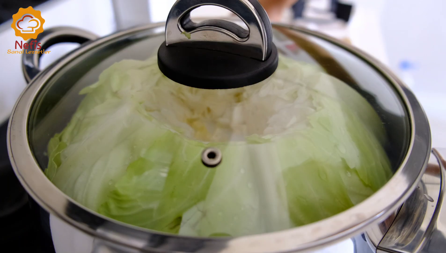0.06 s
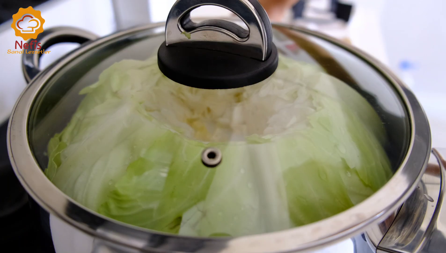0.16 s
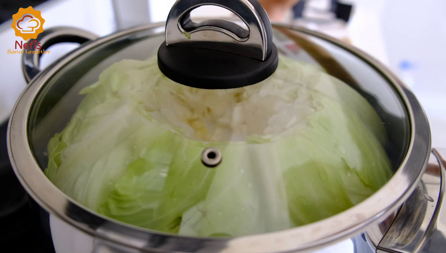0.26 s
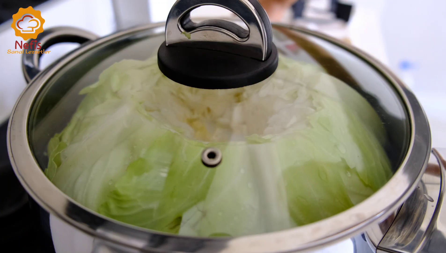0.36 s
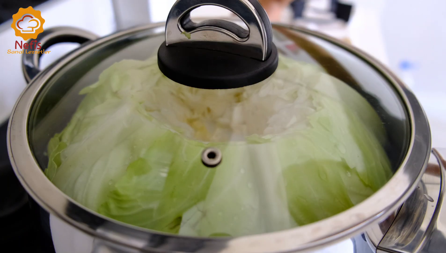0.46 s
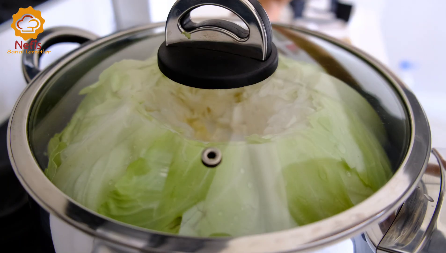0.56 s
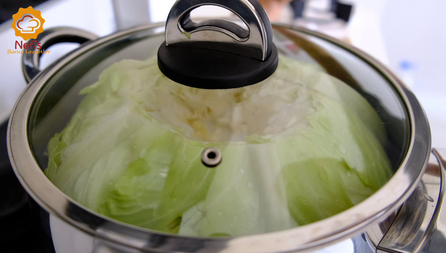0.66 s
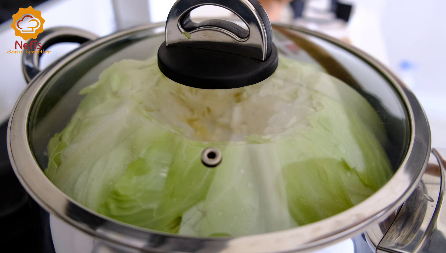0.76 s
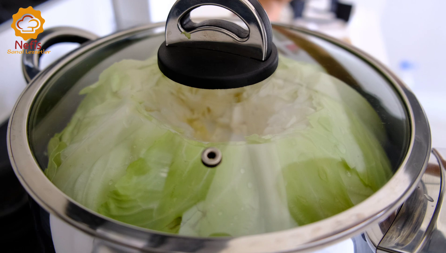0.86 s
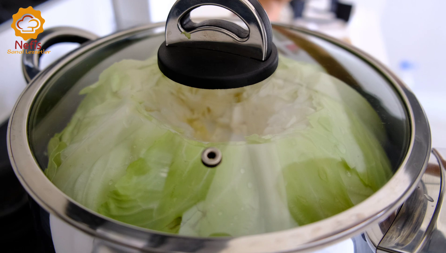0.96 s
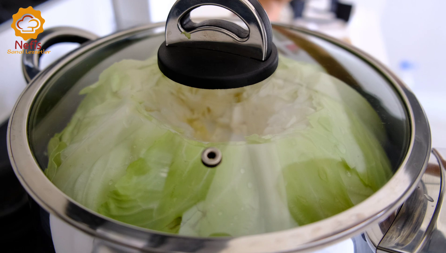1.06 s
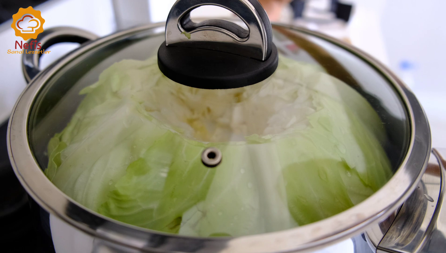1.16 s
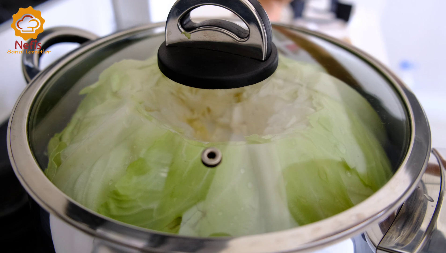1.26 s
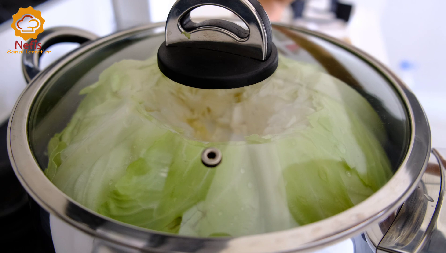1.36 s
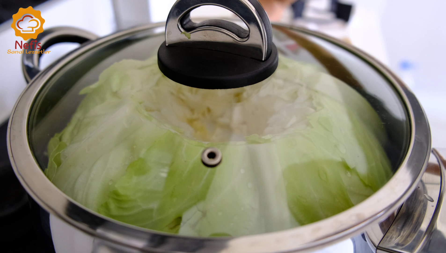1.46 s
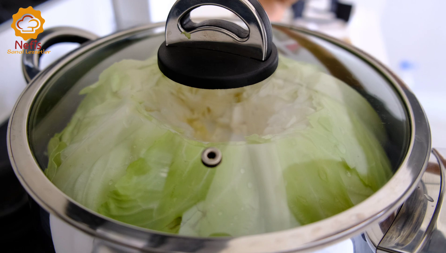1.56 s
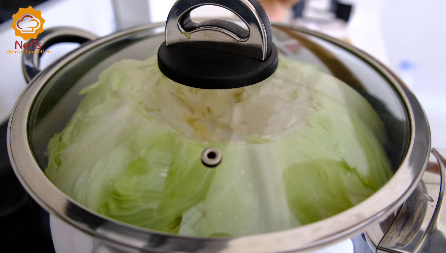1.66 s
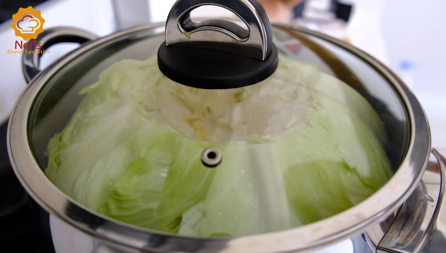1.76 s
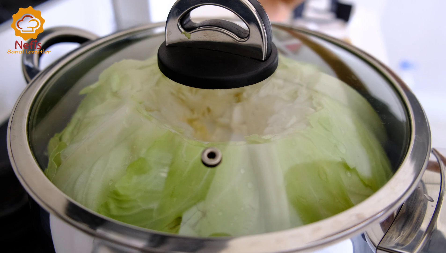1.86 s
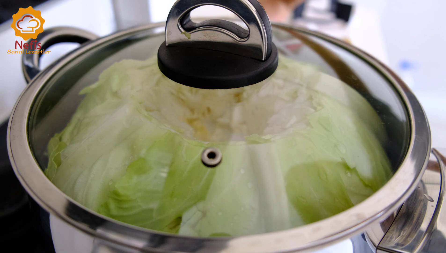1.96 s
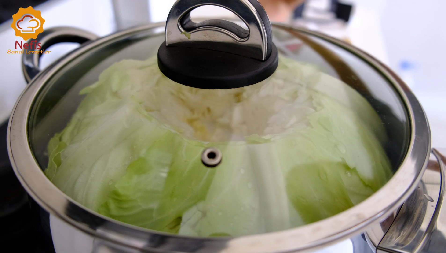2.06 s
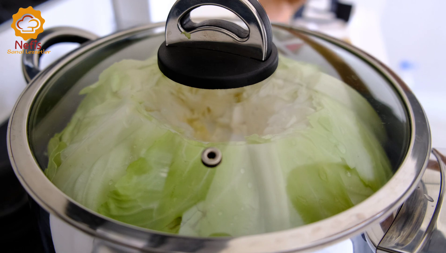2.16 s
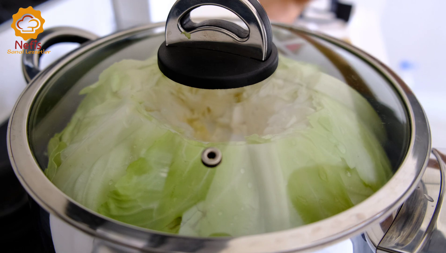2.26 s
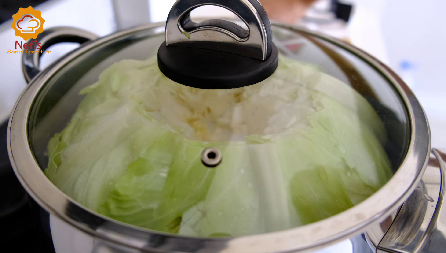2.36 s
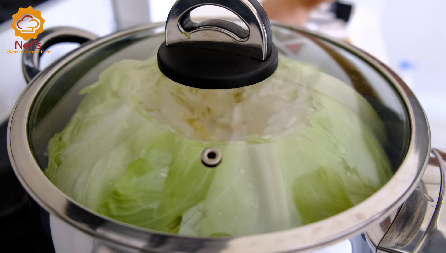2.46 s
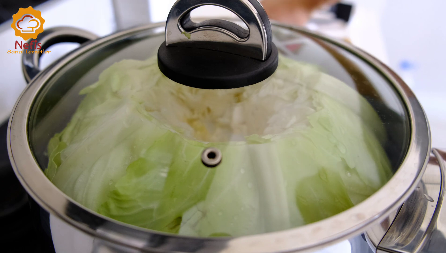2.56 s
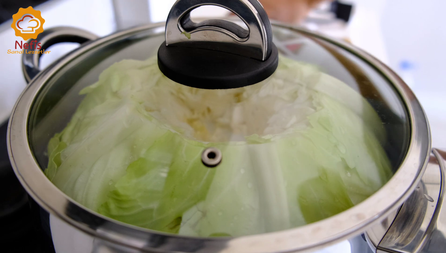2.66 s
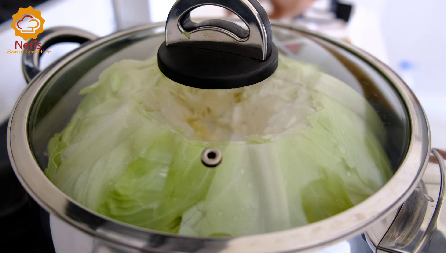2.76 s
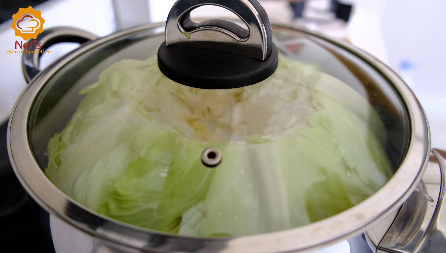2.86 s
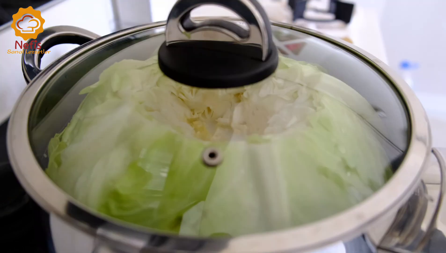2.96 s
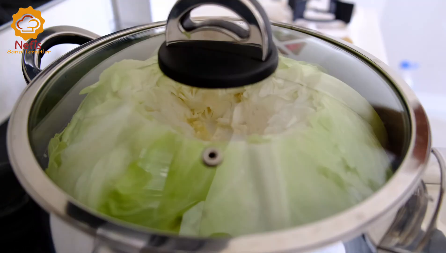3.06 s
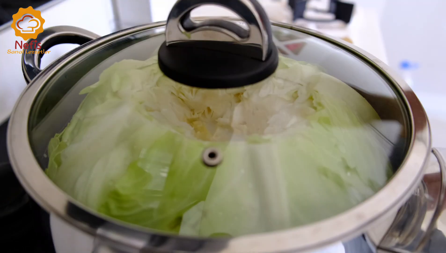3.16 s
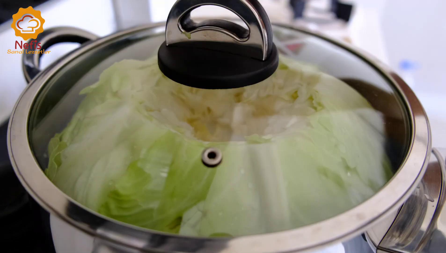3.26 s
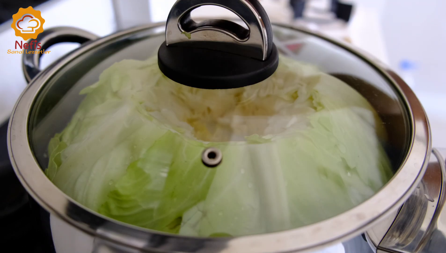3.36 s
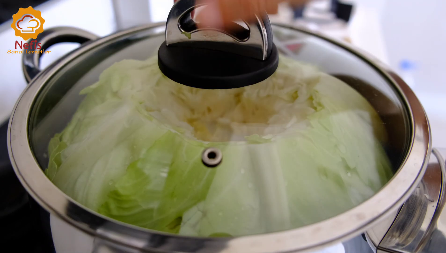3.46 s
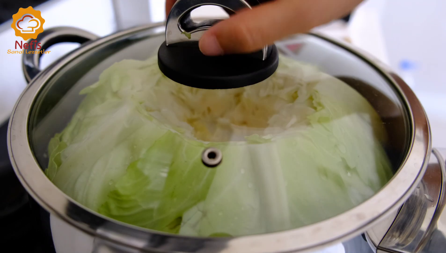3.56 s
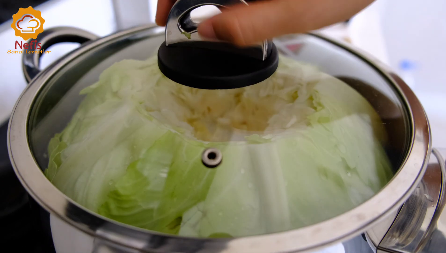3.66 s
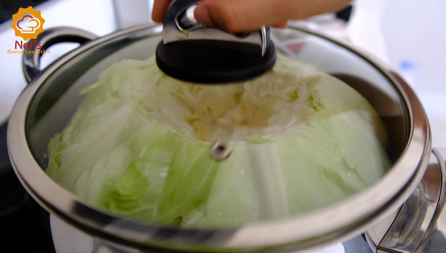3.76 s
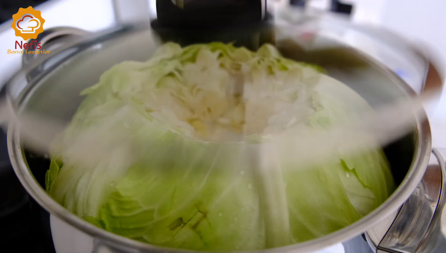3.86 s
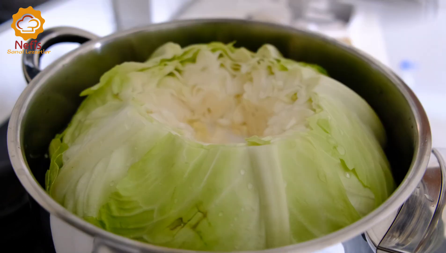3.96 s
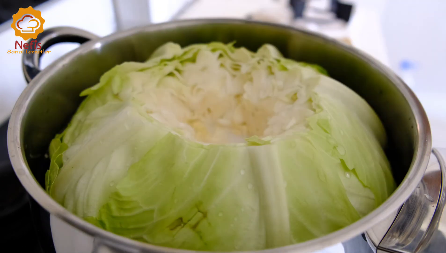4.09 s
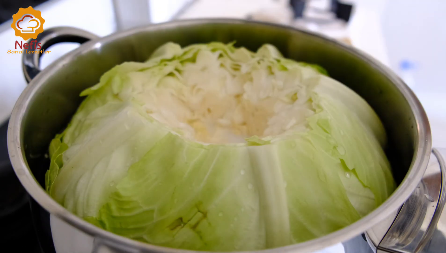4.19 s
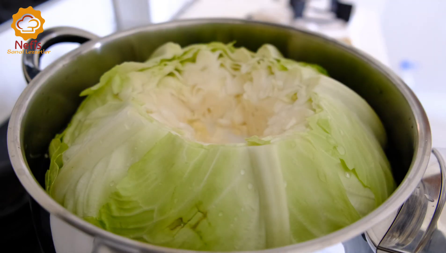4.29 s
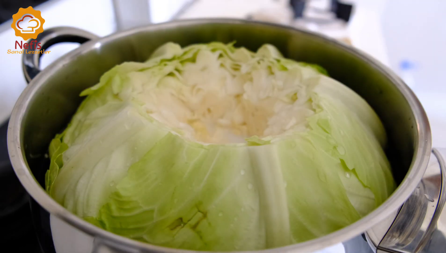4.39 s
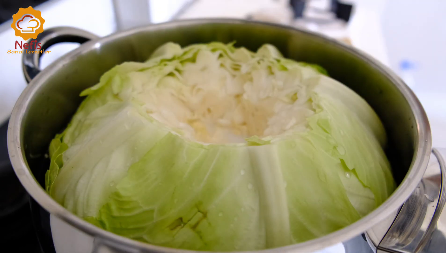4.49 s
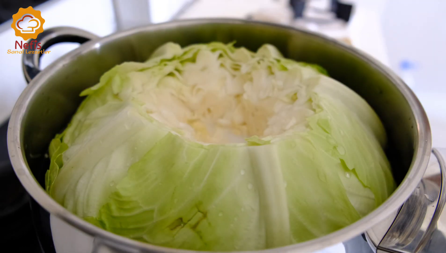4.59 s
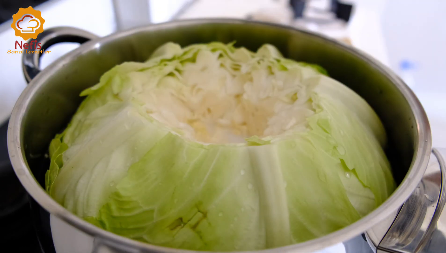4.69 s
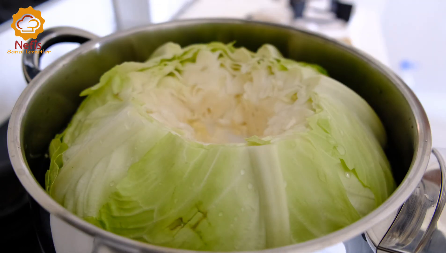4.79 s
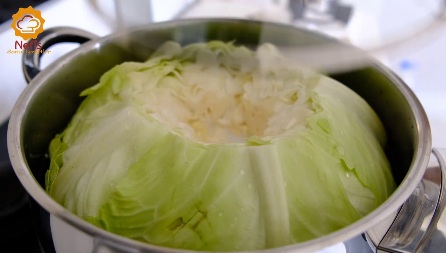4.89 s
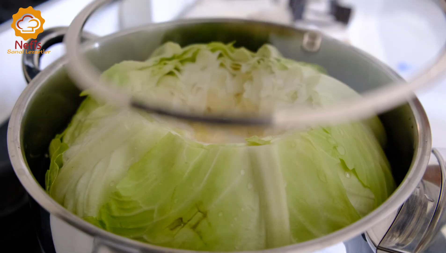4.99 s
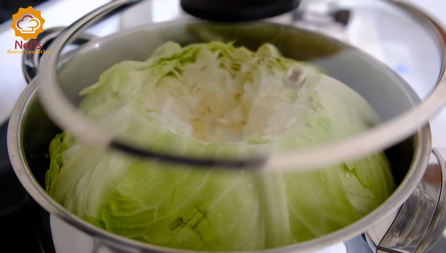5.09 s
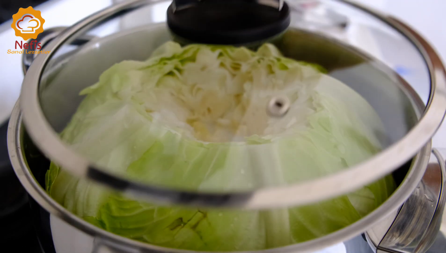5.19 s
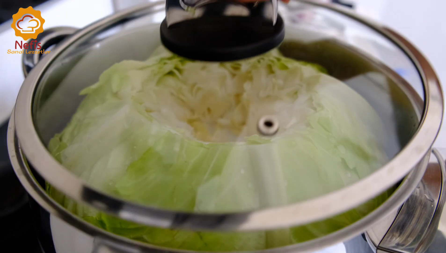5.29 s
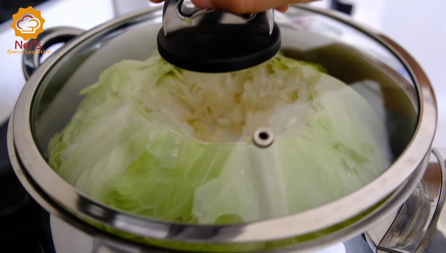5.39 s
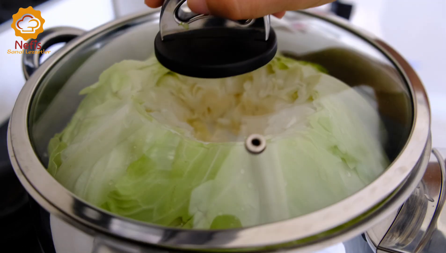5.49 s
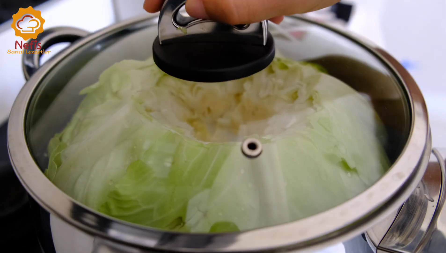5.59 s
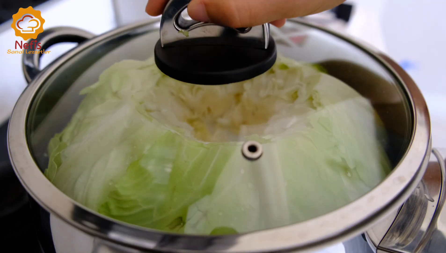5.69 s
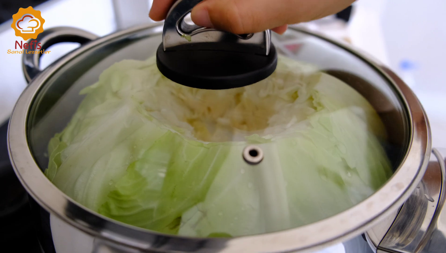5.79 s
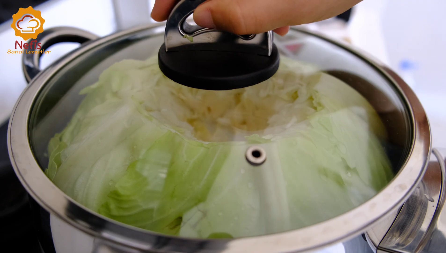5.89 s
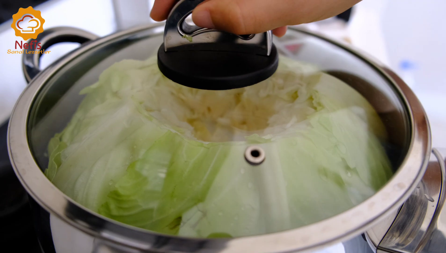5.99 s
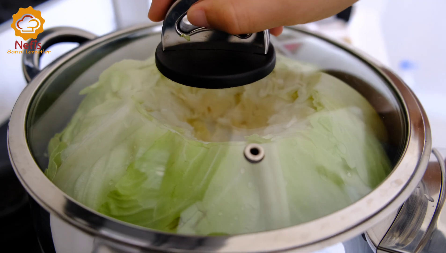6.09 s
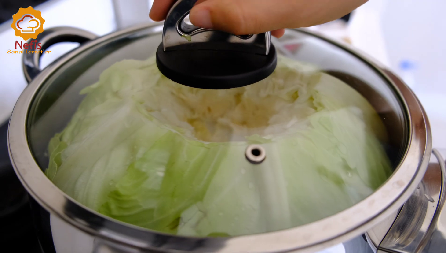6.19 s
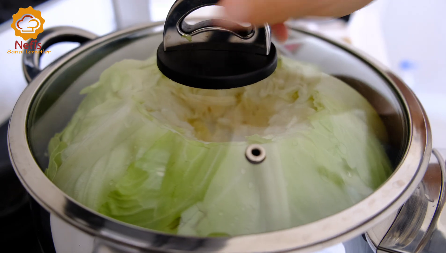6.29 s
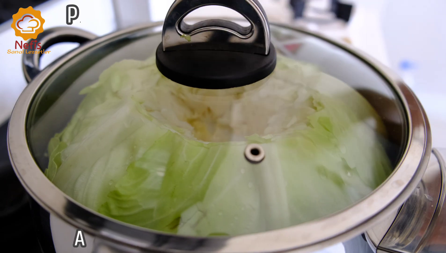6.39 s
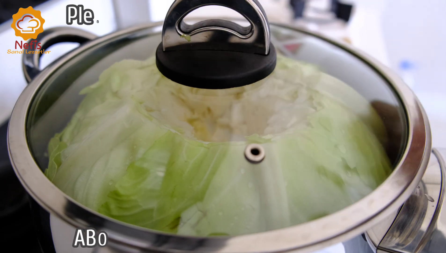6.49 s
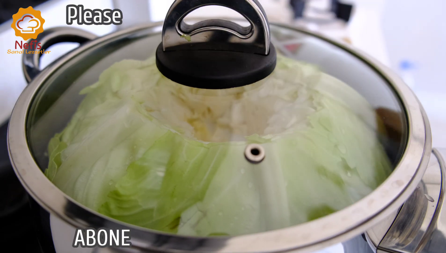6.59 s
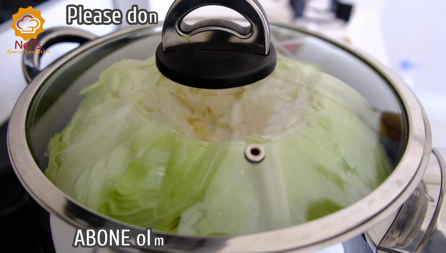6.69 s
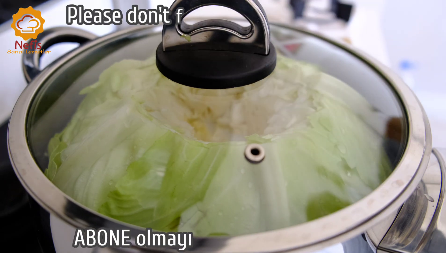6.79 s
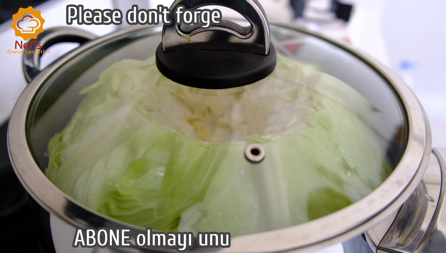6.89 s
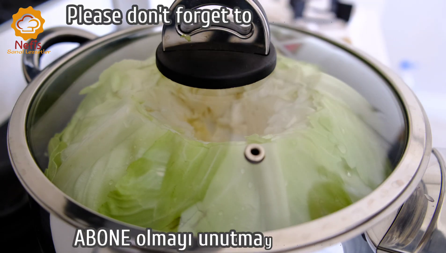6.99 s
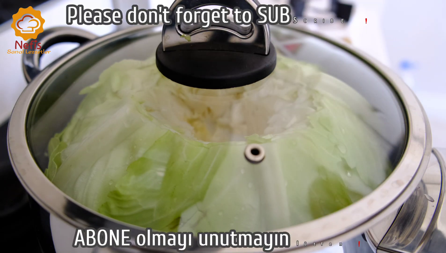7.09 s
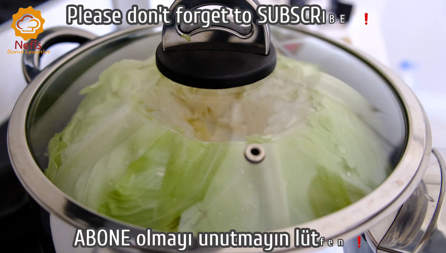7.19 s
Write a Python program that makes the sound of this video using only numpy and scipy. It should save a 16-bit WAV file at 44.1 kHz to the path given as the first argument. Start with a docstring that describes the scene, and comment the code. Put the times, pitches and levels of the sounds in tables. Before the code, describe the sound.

Stove knob clicks and five sharp igniter snaps over hissing gas, followed by a steady burner and a glass pot lid rattling.

```python
"""Covered pot on a gas ring

Close to the stove in a small kitchen, on a stereo microphone. The knob is pushed in, gas hisses and the
igniter sparks five times; the knob springs back and the gas stops. After a short gap the burner hisses
steadily, heard from another spot, while the glass lid is lifted off and set back on the steel rim.
The recorder's gain control ducks after every loud snap."""
import sys
import numpy as np
from scipy import signal
from scipy.fft import rfft, irfft, next_fast_len
from scipy.io import wavfile

SR = 44100
rng = np.random.default_rng(int(sys.argv[2]) if len(sys.argv) > 2 else 0)


def int16_out(signal):
    """Quantize to a 16-bit WAV file."""
    q = np.round(np.clip(np.atleast_2d(signal).T, -1, 1) * 32767)
    wavfile.write(sys.argv[1], SR, q.astype(np.int16))


N = 319284
TIME = np.arange(N) / SR
GAP_START_S, GAP_END_S = 2.998, 3.012   # near silence just before the steady burner


def amp(db):
    """Decibels to gain."""
    return 10 ** (np.asarray(db, float) / 20)


def rms_one(x):
    """Scale to unit rms."""
    return x / np.sqrt(np.mean(x ** 2) + 1e-20)


def at_hz(points, hz):
    """Read (frequency, value) points on a log-frequency axis."""
    point_hz, values = np.transpose(points)
    return np.interp(np.log(hz + 1), np.log(point_hz), values)


def butter(x, hz, kind, order=2):
    """Butterworth filter."""
    return signal.sosfilt(signal.butter(order, hz, kind, fs=SR, output="sos"), x)


def shape(x, response):
    """Filter by a response given as a function of Hz."""
    size = next_fast_len(N + SR // 8)
    return irfft(rfft(x, size) * response(np.arange(size // 2 + 1) * SR / size), size)[..., :N]


def diffuse(colour):
    """Noise from all around the microphone, alike in the bass and unrelated in the treble; rms 1."""
    # likeness of left and right: (frequency [Hz], correlation [-1..1])
    likeness = [(60, 0.36), (180, 0.57), (550, 0.83), (1650, 0.096), (4970, 0.036), (15000, 0.08)]
    mid, side = rng.standard_normal((2, N))
    mid = shape(mid, lambda hz: amp(at_hz(colour, hz)) * np.sqrt(1 + at_hz(likeness, hz)))
    side = shape(side, lambda hz: amp(at_hz(colour, hz)) * np.sqrt(1 - at_hz(likeness, hz)))
    return rms_one(np.array([mid + side, mid - side]))


def room(x):
    """Kitchen reverberation: octave bands of noise, each dying at its own rate."""
    # decay of the room: (frequency [Hz], t60 [s])
    room_t60 = [(100, 0.47), (1000, 0.41), (5000, 0.31), (15000, 0.23)]
    t, tail = TIME[:SR // 2], 0
    white = diffuse([(20, 0), (20000, 0)])[:, :len(t)]
    for low_hz in 40 * 2. ** np.arange(9):
        band = butter(white, [low_hz, min(2 * low_hz, 19000)], "band")
        tail = tail + band * amp(-60 * t / at_hz(room_t60, 1.4 * low_hz))
    tail *= np.clip(t / 0.002, 0, 1) ** 2   # the first walls answer after a few ms
    return signal.fftconvolve(x, rms_one(tail) / np.sqrt(len(t)), axes=1)[:, :N]


def kitchen_air():
    """Room tone: it fades slowly, drops out in the gap and stays low beside the burner."""
    # spectrum of the quiet kitchen: (frequency [Hz], density [dB])
    colour = [(15, -41), (25, 1), (221, -14.5), (253, -21.5), (322, -9.5), (445, -21.5), (495, -9),
              (631, -14.5), (1660, -16), (10600, -38), (15500, -43)]
    level_db = np.select([TIME < GAP_START_S, TIME < GAP_END_S], [-51.5 - 2.2 * TIME, -72], -58.5)
    return amp(level_db) * diffuse(colour)


def hand_rustle():
    """A hand brushes about: each stroke of noise swells to its peak and fades."""
    # strokes: (peak time [s], peak level [dB], swell [dB/s], fade [dB/s])
    brushes = [(2.796, -52.5, 93, 350), (2.902, -53, 1200, 209)]
    # spectrum of the brushing: (frequency [Hz], density [dB])
    colour = [(120, -33), (200, -15), (3120, -23.5), (5300, -26.5), (6590, -29), (8050, -30),
              (15500, -39.5)]
    strokes_db = [peak_db - np.where(TIME < s, swell * (s - TIME), fade * (TIME - s))
                  for s, peak_db, swell, fade in brushes]
    return amp(np.max(strokes_db, axis=0)) * diffuse(colour)


def burner_resonances():
    """The jet sings in the air spaces of burner and pot base; each reaches the two capsules differently."""
    # air spaces: (frequency [Hz], width [Hz], level igniting [dB], level steady [dB],
    # left over right [dB], left lag [ms])
    air_spaces = [(711, 398, -15, -10.5, -0.5, 0.022), (973, 103, -5, -2.5, 2.5, 0.078),
                  (1050, 57, -1.5, -0.5, 5, .05), (1170, 202, -5.5, -8, -8.5, .06),
                  (1277, 190, 0.5, 0, 0.5, .07), (1463, 150, -5.5, -6, -1, 0.14),
                  (3265, 210, -5.5, -6, 2, 0.088), (3724, 180, -7.5, -2, -6, 0.067),
                  (3870, 60, -8.5, -15.5, -3.5, .04), (4768, 220, -8.5, -6.5, 5, .01),
                  (5880, 470, -13.5, -10.5, -0.5, 0.061), (6730, 540, -17.5, -15, 2, .04),
                  (7740, 140, -20.5, -15.5, 2, 0.027), (8640, 140, -20.5, -14, 2.5, .01),
                  (8693, 220, -19.5, -18.5, 0, .01), (10200, 360, -24, -24, -2.5, 0.013),
                  (11160, 470, -16.5, -12.5, 2, 0.029), (12830, 480, -34.5, -25, 2.5, 0.0096)]
    peak_hz, width_hz, igniting_db, steady_db, pan_db, lag_ms = np.transpose(air_spaces)[:, :, None]
    grid = np.geomspace(20, SR / 2, 3000)
    polarity = (-1.) ** np.arange(len(air_spaces))[:, None]
    peaks = polarity / (1 + 1j * (grid ** 2 - peak_hz ** 2) / (grid * width_hz)) ** 2
    half_lag = np.pi * grid * lag_ms / 1000
    responses = [np.sum(peaks * amp(level_db + side * pan_db / 2) * np.exp(-1j * side * half_lag), 0)
                 for level_db in (igniting_db, steady_db) for side in (1, -1)]
    sung = shape(rng.standard_normal(N), lambda hz: np.array([np.interp(hz, grid, r) for r in responses]))
    pitch = np.where(TIME < .245, 1.055, 1 - .017 * TIME)   # higher while raw gas first fills the spaces
    igniting = [np.interp(np.cumsum(pitch), np.arange(N), channel) for channel in sung[:2]]
    return rms_one(np.where(TIME < (GAP_START_S + GAP_END_S) / 2, igniting, sung[2:]))


def gas_jet():
    """Jet noise, part resonant, part diffuse: it dies as the knob is let go and is steady after the gap."""
    # spectrum of the diffuse hiss: (frequency [Hz], density [dB])
    colour = [(18, -28.5), (35, -3.5), (114, -3.5), (400, -22), (1260, -14), (2690, -16.5), (3780, -16),
              (4900, -16.5), (5400, -23.5), (6400, -19), (8000, -25.5), (9500, -22), (11500, -21.5),
              (14800, -26.5), (15600, -56.5)]
    knob_release_s, steady_db = 2.08, -46.5
    sung = burner_resonances()
    flutter_db = 0.76 * rms_one(butter(rng.standard_normal(N), 25, "low"))   # the jet wavers slightly
    since_release = np.maximum(TIME - knob_release_s, 0)
    shutoff_db = 13 * (1 - np.exp(-since_release / .012)) + 120 * since_release   # quick drop, then fade
    igniting_db = -43.5 - 2.06 * TIME - shutoff_db
    level = amp(np.where(TIME < GAP_END_S, igniting_db, steady_db))
    return level * (sung * amp(flutter_db) + amp(-5) * diffuse(colour))


def touches(events, modes, ring_db, tick_db, clatter_s, clatter_db, spread_db):
    """Each touch sets the modes ringing, damped by the grip, and adds a grainy clatter in five zones."""
    edges_hz = [70, 300, 800, 2100, 3200, 10000]   # zones: thud, body, knock, chime, tick
    bands, knock = list(zip(edges_hz, edges_hz[1:])), 2
    t, clatter_n, out = TIME[:SR // 4], SR // 8, np.zeros(N + SR)
    hz, mode_db, t60 = np.transpose(modes)[:, :, None]
    zone = np.searchsorted(edges_hz, hz[:, 0]) - 1
    waves = np.sin(2 * np.pi * hz * t) * (1 - np.exp(-hz * t * 3))   # soft contact: swells within a cycle
    for s, thud_db, body_db, knock_db, knock_hz, chime_db, t60_share in events:
        zone_db = np.array([thud_db, body_db, knock_db, chime_db, chime_db + tick_db])
        strength = amp(ring_db + zone_db[zone] + rng.normal(0, spread_db, len(modes)))
        strength *= rng.choice([-1, 1], len(modes))
        # the spot that is hit picks the knock modes
        strength *= amp(-7 * np.abs(np.log2(hz[:, 0] / knock_hz)) * (zone == knock))
        bands[knock] = (knock_hz / 1.66, knock_hz * 1.42)
        sound = strength @ (waves * amp(mode_db - 60 * t / (t60 * t60_share)))
        grains = rng.standard_normal(clatter_n) * rng.exponential(1, clatter_n)
        clatter = grains * np.exp(-t[:clatter_n] / clatter_s)
        for band, level_db in zip(bands, zone_db):
            band_rms = np.std(butter(grains[:clatter_n // 2], band, "band"))
            sound[:clatter_n] += amp(clatter_db + level_db) * butter(clatter, band, "band") / band_rms
        at = round(s * SR)
        out[at:at + len(t)] += sound
    return butter(out[:N], 50, "high")   # small bodies radiate no deep bass


def gas_knob():
    """The knob clicks and thuds under the hand as it is pushed in and springs back."""
    # hand on knob: (time [s], thud [dB], body [dB], knock [dB], knock centre [Hz], chime and tick [dB],
    # share of free ringing time [ratio])
    events = [(.002, -25, -25.5, -43, 1200, -42, 0.48), (.143, -37, -60, -55, 1190, -53, 0.34),
              (.595, -38, -39, -45, 1320, -46.5, 0.37), (2.077, -34, -40.5, -44, 900, -54, 0.1),
              (2.188, -52, -41, -32, 1050, -38.5, 0.82), (2.785, -58, -55, -60, 1205, -55, .31)]
    # resonances of the knob: (frequency [Hz], level [dB], t60 [s])
    modes = [(123, 12.5, 0.24), (325, 4.5, 0.12), (748, 0.5, .1), (900, -3, .1), (1050, 0, 0.0797),
             (1180, -5, .1), (1880, 2, .12), (2170, -0.5, 0.17), (2260, 2, .22), (2340, -3.5, 0.27),
             (2410, 0.5, .2), (2560, -6, .18)]
    return touches(events, modes, ring_db=-7.5, tick_db=-14.5, clatter_s=0.02, clatter_db=-5, spread_db=3.5)


def pot_lid():
    """The glass lid knocks on the steel rim, off and on again; hand and rim damp the ringing."""
    # lid on rim: (time [s], thud [dB], body [dB], knock [dB], knock centre [Hz], chime and tick [dB],
    # share of free ringing time [ratio])
    events = [(3.739, -42, -42, -28, 1270, -41, 0.2), (3.748, -29.5, -37, -43, 1240, -51, 0.48),
              (3.777, -26.5, -32.5, -45, 800, -41, 0.72), (3.787, -26, -25, -14.5, 1690, -29, 0.19),
              (3.796, -20.5, -19, -15.5, 970, -26, 0.22), (3.811, -27.5, -20.5, -26, 870, -30.5, 0.33),
              (3.834, -29, -30, -28, 960, -34, .24), (3.859, -39, -33.5, -30.5, 1780, -38, 0.55),
              (5.575, -28.5, -21, -14, 1070, -29, 0.38), (5.589, -36, -50, -18, 910, -27.5, .52),
              (5.623, -50, -50, -21.5, 910, -36, 0.63), (5.636, -37, -21, -17, 970, -33, 0.43),
              (5.644, -46, -21, -14, 1020, -28.5, 0.35), (5.663, -36, -27, -22, 940, -32.5, 0.52),
              (5.689, -31.5, -46, -34, 1690, -40, 0.38), (5.855, -11.5, -16, -11, 1030, -20, 0.26),
              (5.86, -18, -21.5, -12.5, 1240, -27, 0.56), (5.873, -25, -40, -22, 1060, -23.5, 0.38),
              (5.883, -21, -18, -14, 920, -25, 0.11), (5.925, -42, -28, -22.5, 1100, -33, 0.35),
              (5.934, -33, -37, -25, 950, -33, 0.21), (6.055, -32, -38, -36, 880, -48, 0.47),
              (6.114, -26, -27, -12.5, 1500, -34, 0.25), (6.117, -17.5, -20, -35, 1320, -30, 0.29),
              (6.143, -32, -33, -36, 1370, -43, .4), (6.184, -34, -32.5, -35, 1050, -44, .44),
              (6.384, -26.5, -46, -19, 1360, -45, 0.43), (6.41, -19, -26, -41, 1170, -40, 0.73),
              (6.42, -38, -33, -31, 1020, -37, .25), (6.456, -28.5, -38, -31, 1370, -48, 1),
              (6.486, -24.5, -26.5, -27, 1970, -40, 0.82), (6.541, -40, -35, -46, 1070, -52, 0.55)]
    # resonances of pot and lid: (frequency [Hz], level [dB], t60 [s])
    modes = [(119.2, -2, 0.43), (143, 6.5, 0.067), (178.7, 11, 0.082), (367, 9, 0.047), (479, -0.5, 0.19),
             (616, 6.5, 0.1), (880, -0.5, 0.029), (936, -3.5, 0.1), (1030, -4.5, 0.04), (1195, -0.5, 0.046),
             (1530, -9, 0.05), (1759, -7.5, 0.06), (1853, -4, 0.049), (2575, 5, 0.21), (2690, 12, 0.028),
             (3460, -18.5, 0.3), (3590, 2.5, 0.18), (4310, 4, 0.04), (4470, -3.5, 0.18), (5270, -1, 0.12),
             (5868, -4, 0.085), (6370, -9, 0.21), (7060, -13, 0.25)]
    return touches(events, modes, ring_db=-5, tick_db=-3, clatter_s=0.005, clatter_db=-5.5, spread_db=2.5)


def igniter():
    """Each spark rattles between burner and pot base for a few ms and jolts the microphone off centre."""
    # sparks: (time [s], snap [dB], low jolt left [dB], low jolt right [dB])
    sparks = [(0.2341, 7, -10, -22), (0.6142, 5, -7, -45), (0.9938, 7, -13.5, -16.5),
              (1.3731, 6.5, -10.5, -40), (1.7537, 6, -19.5, -25)]
    # spectrum of a snap: (frequency [Hz], density [dB])
    colour = [(150, -6.5), (400, 3), (800, -2), (1300, -7), (2800, -11.5), (3800, -3.5), (5500, -4.5),
              (7500, -1.5), (9000, 0), (11300, 2.5), (13000, -11.5), (15000, -14), (16400, -40.5)]
    rattles, impulses, jolts = np.zeros((3, 2, N))
    t = TIME[:SR // 20]
    rattle_fade = np.exp(-t / 0.004) / (1 + np.exp((t - 0.0019) / 0.0069))
    push = 1.52 * (1 - np.exp(-t / 0.00045)) * np.exp(-(t / 0.0029) ** 2)
    for s, snap_db, *jolt_db in sparks:
        for ch, (lag_s, pan_db) in enumerate([(0, 0.1), (.0008, -2.5)]):   # the right capsule is farther
            at = round((s + lag_s) * SR)
            rattles[ch, at:at + len(t)] += amp(snap_db + pan_db) * rattle_fade * rng.standard_normal(len(t))
            impulses[ch, at] = amp(snap_db)
            jolts[ch, at:at + len(t)] += amp(jolt_db[ch]) * push
    crack, bang = shape(np.array([rattles, impulses]), lambda hz: amp(at_hz(colour, hz)))
    jolts = butter(jolts, 14, "high")   # the coupling capacitor swings the offset back slowly
    escaped = butter(bang, 4500, "high", order=1)   # only the treble escapes from under the pot
    return amp(-1.32) * crack + amp(-2) * bang + jolts + amp(8.5) * room(escaped)


def scene():
    """The stove at the microphone: burner, hands and lid, with the room around the sharp sounds."""
    hits = amp([[.1], [-.1]]) * (pot_lid() + gas_knob())   # almost dead centre
    bed = gas_jet() + kitchen_air() + hand_rustle()
    return bed + igniter() + hits + amp(-3.5) * room(hits)


def record(dry):
    """The recorder: gain control that acts a few ms late and recovers slowly, overload, then a top cut."""
    threshold_db, lag_s, cutoff_hz = -9, 0.0035, 16665
    sensed = dry + 0.8 * np.diff(dry, prepend=0)   # the detector leans to the treble
    over_db = np.maximum(20 * np.log10(np.abs(sensed).max(0) + 1e-9) - threshold_db, 0)
    release_db = 52 * TIME
    held_db = np.maximum.accumulate(over_db + release_db) - release_db
    pole = np.exp(-1 / (lag_s * SR))
    duck_db = .8 * signal.lfilter([(1 - pole) ** 2], [1, -2 * pole, pole ** 2], held_db)
    clipped = np.clip(dry * amp(-duck_db), -.9, .9)
    return signal.sosfilt(signal.cheby2(16, 60, cutoff_hz, fs=SR, output="sos"), clipped)


dry = scene()
out = record(dry)
int16_out(out)
```